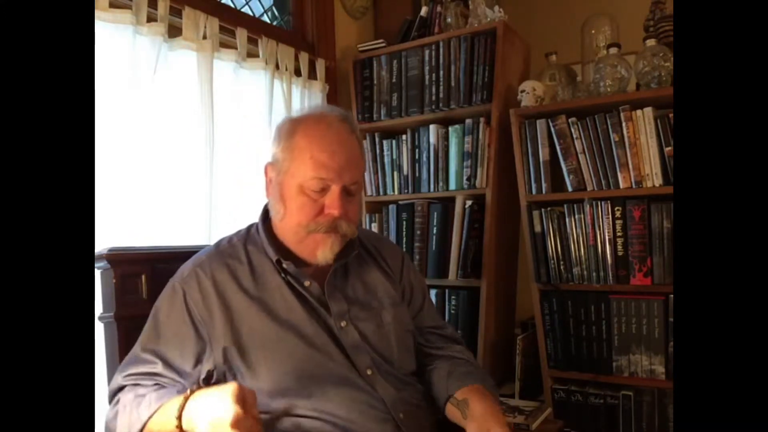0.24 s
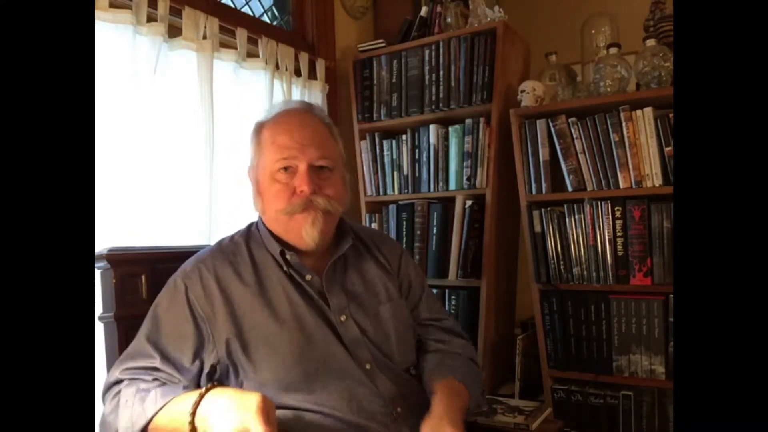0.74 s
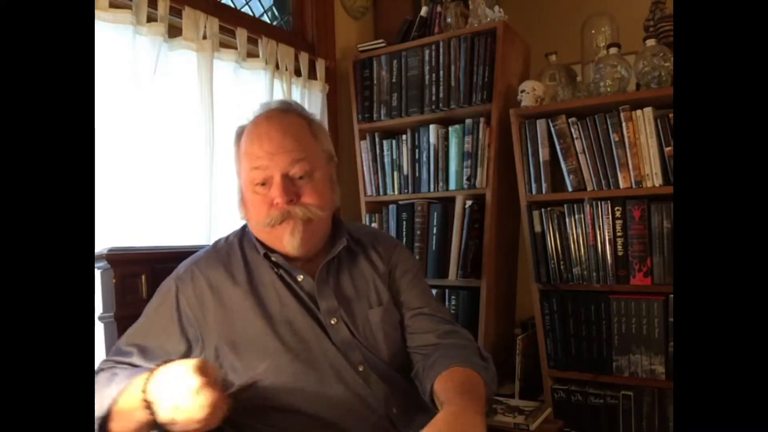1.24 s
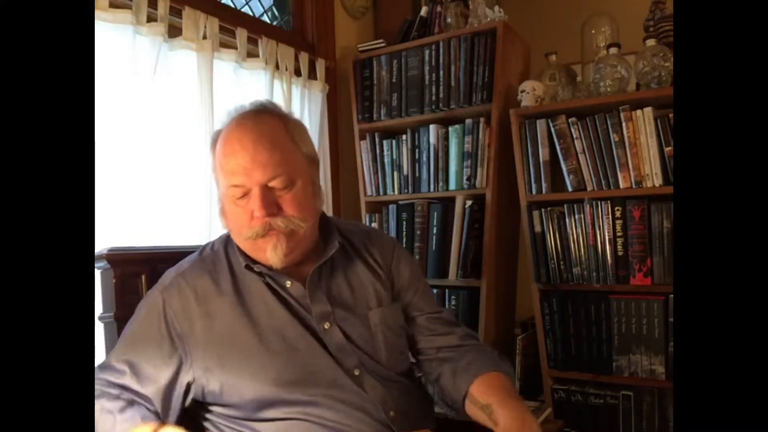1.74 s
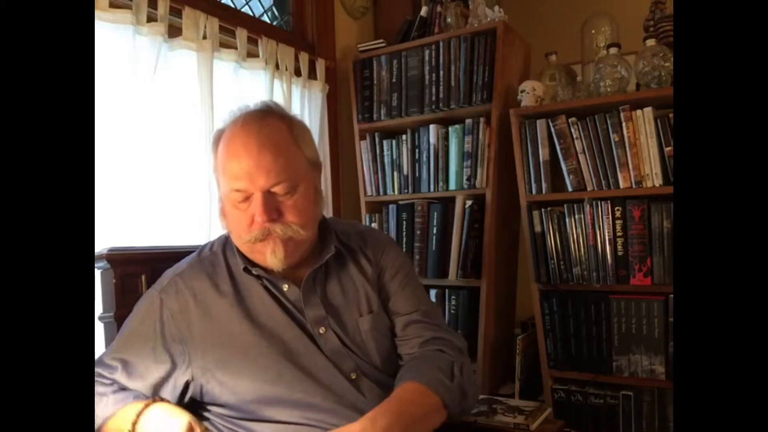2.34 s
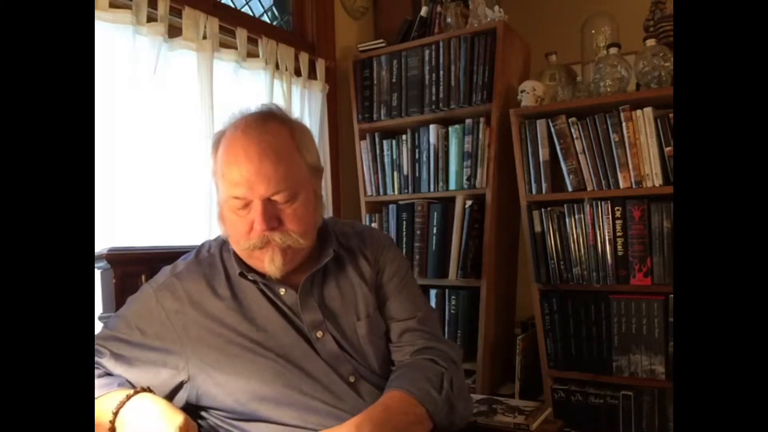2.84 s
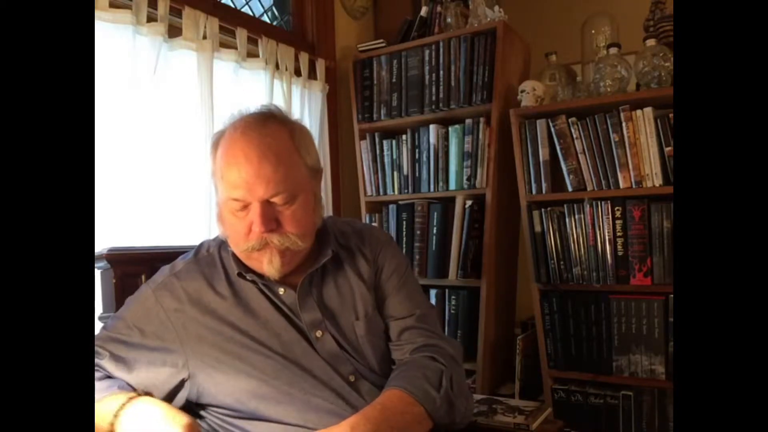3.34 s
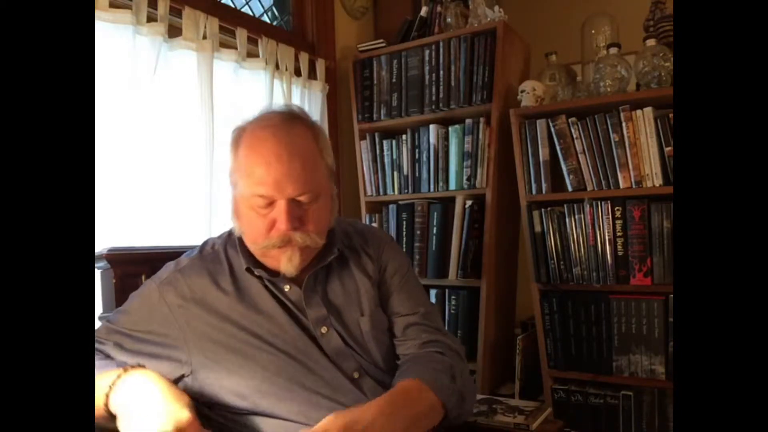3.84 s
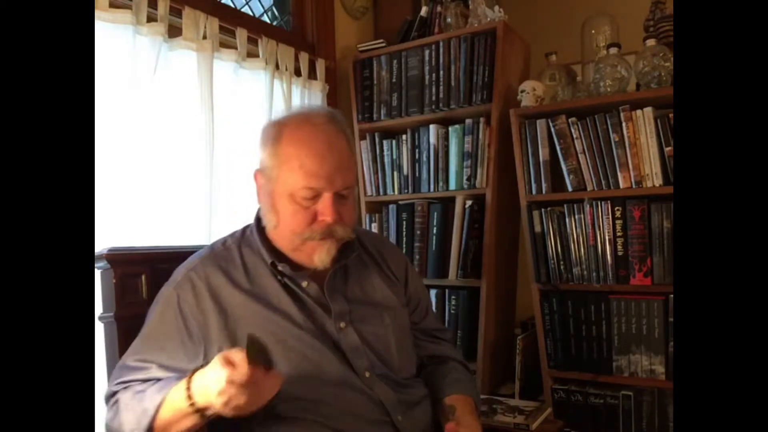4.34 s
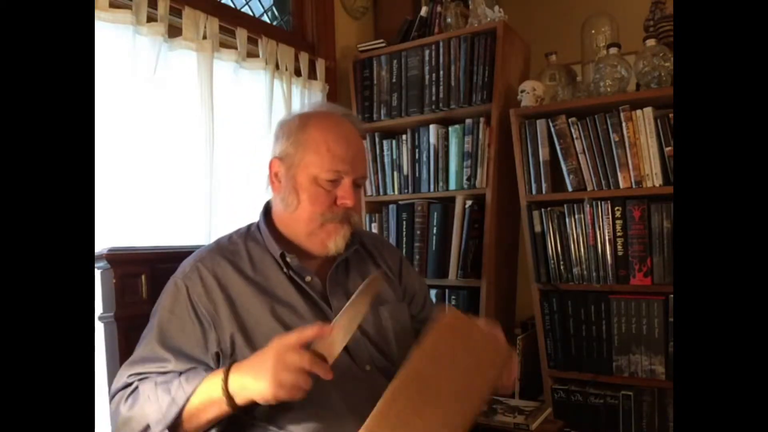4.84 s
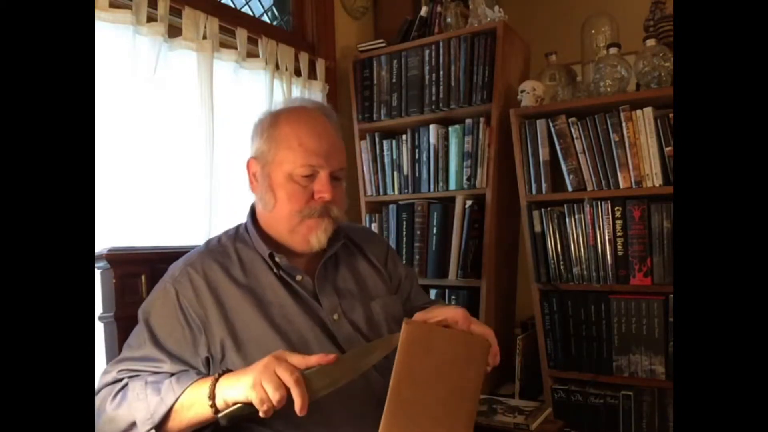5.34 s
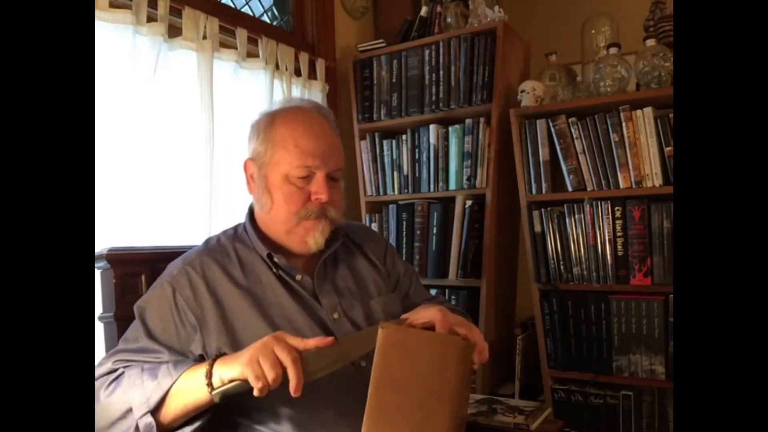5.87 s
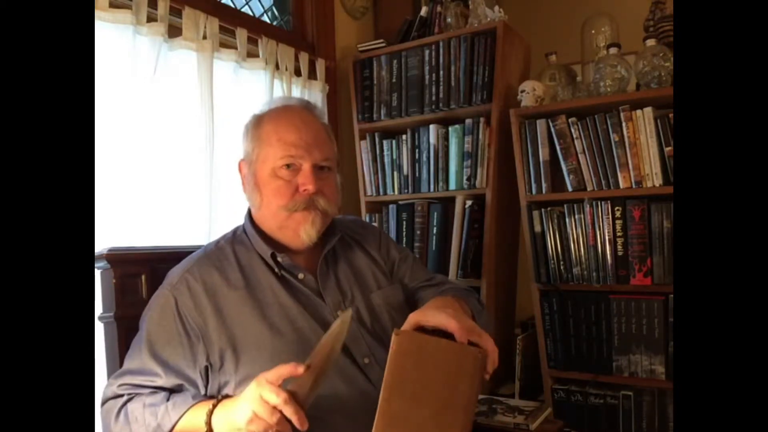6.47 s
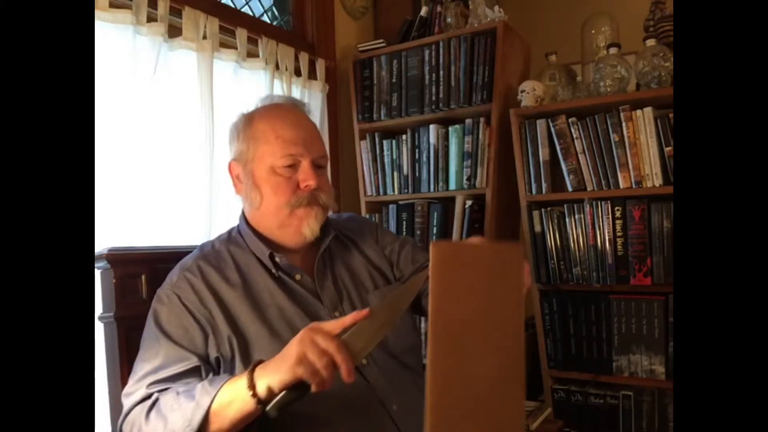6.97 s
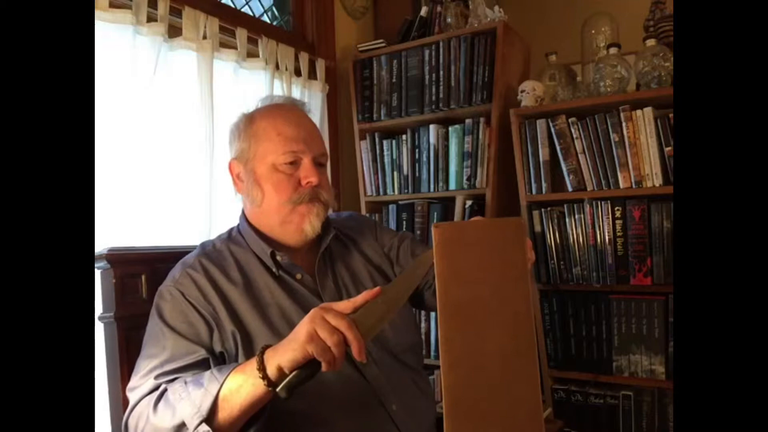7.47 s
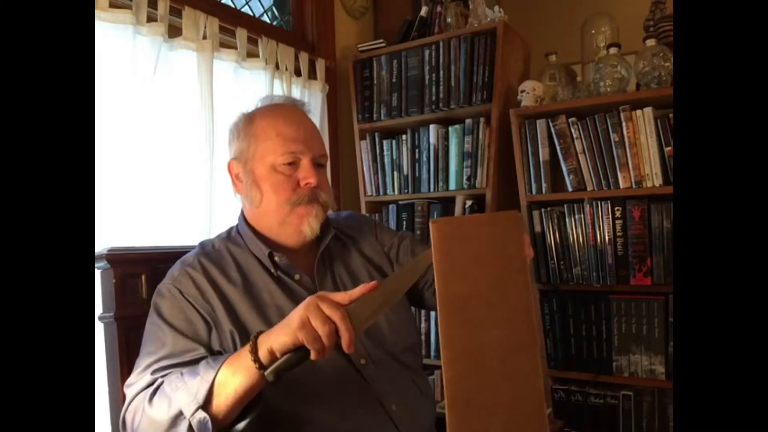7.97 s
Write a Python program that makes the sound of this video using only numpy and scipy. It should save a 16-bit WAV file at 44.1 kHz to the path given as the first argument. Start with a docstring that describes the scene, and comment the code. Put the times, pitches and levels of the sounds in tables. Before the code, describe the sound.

In a quiet small room, a box is shuffled, a knife clacks down, tape bursts and tears, and the cardboard is lifted with light taps.

```python
"""A knife opens a cardboard box

In a small, quiet room hands and box slide, the blade clacks, then punches through tape and runs along the seam.
The box is lifted and handled, with hollow knocks and small clicks. Friction is random slip impulses through
spectra and resonances; blows are decaying noise and modes with a short room tail. Both channels are alike."""
import sys
import numpy as np
from scipy import signal
from scipy.fft import rfft, irfft, next_fast_len
from scipy.io import wavfile
from scipy.ndimage import uniform_filter1d, map_coordinates

SR = 44100
rng = np.random.default_rng(int(sys.argv[2]) if len(sys.argv) > 2 else 0)


def int16_out(signal):
    """Quantize to a 16-bit WAV file."""
    q = np.round(np.clip(np.atleast_2d(signal).T, -1, 1) * 32767)
    wavfile.write(sys.argv[1], SR, q.astype(np.int16))


N = 361837
T = np.arange(SR // 3) / SR  # time axis of one blow [s]

# Blade strokes in the seam:
# (fastest motion [s], rise [s], fall [s], tape hiss [dB], bright rasp [dB], hollow rasp [dB])
SEAM_PULLS = [(3.627, 0.043, 0.027, -43.5, -40, -53), (3.68, .075, 0.13, -53.5, -46.5, -44.5),
              (3.93, 0.069, 0.051, -53.5, -55, -53)]
# Hiss of torn tape: (frequency [Hz], relative level [dB])
TAPE_SPECTRUM = [(2000, -45), (4000, 3), (4900, -2), (5800, 4.5), (7500, -1.5), (10000, -3), (13000, -7),
                 (16000, -15)]
# Resonances of the seam: (frequency [Hz], width [Hz], relative level [dB])
SEAM_MODES = [(2135, 120, -3.5), (2390, 210, -7), (2710, 55, 1.5), (3240, 140, -0.5), (3870, 300, -18)]
# Resonances of the open slit: (frequency [Hz], width [Hz], relative level [dB])
SLIT_MODES = [(1400, 300, 5.5), (1705, 95, 10), (1770, 170, -13)]
# Resonances of the card panels: (frequency [Hz], width [Hz], relative level [dB])
PANEL_MODES = [(118, 57, -5), (200, 51, 0.5), (308, 115, -0.5), (430, 28, -6.5), (593, 83, -5.5)]
# Resonances of the stiff box edges: (frequency [Hz], width [Hz], relative level [dB])
EDGE_MODES = [(454, 203, 0.5), (627, 108, 3.5), (950, 235, -3), (1185, 200, -2.5), (1446, 260, -3.5)]
# the blade shakes the box for as long as it is in the seam
CUT_S, CUT_HOLD_S, CUT_DRONE_DB = 3.56, 0.396, -51


def cutting():
    """Stick-slip tearing: one train of uneven slips excites the tape, the seam, the opening slit and the box."""
    hiss, bright, hollow = movements(SEAM_PULLS)
    drone = amp(CUT_DRONE_DB) * swell(CUT_S, rise_s=0.066, fall_s=0.021, hold_s=CUT_HOLD_S)
    tear = slips(rate=3500, spread_db=1.5, clump_db=1.1, clump_rate=170)
    tape = reflected(coloured(tear, TAPE_SPECTRUM), wet_db=-5.5)
    seam = shifting(band(resonate(tear, SEAM_MODES), 1750, 4800), patchy_db=2.5)
    slit = shifting(band(resonate(tear, SLIT_MODES), 680, 2460), patchy_db=5.5)
    body = resonate(tear, PANEL_MODES) + amp(-14) * resonate(tear, EDGE_MODES)
    box = unit(band(body, 135, 1400))
    return hiss * tape + bright * seam + hollow * slit + drone * box


# The point breaking through the tape:
# (time [s], overall gain [dB], treble tilt setting [dB], boom gain [dB], tearing t60 [s])
TAPE_STABS = [(3.4057, -19, -9, -5, 0.3), (3.4731, -19.5, -17, -7, 0.27), (3.5075, -23, -23.5, -7.5, 0.044)]
# Crack of the tape: (frequency [Hz], relative level [dB])
CRACK_SPECTRUM = [(150, -34), (600, -2.5), (1400, -1), (2200, -2), (3200, -2.5), (4800, -4.5), (6500, -6.5),
                  (9500, -5.5), (12500, -8.5), (16000, -7.5)]
# The lid springing under each stab: (frequency [Hz], level within the boom [dB], t60 [s])
LID_MODES = [(118, -11, .11), (245, -5, .07)]
# The box standing on the table: (frequency [Hz], width [Hz], relative level [dB])
BOOM_MODES = [(128, 24, -0.5), (187, 26, -0.5), (242, 98, -3.5), (335, 44, -1.5), (431, 15, -5.5),
              (620, 16, -5.5), (1070, 130, -50), (1435, 110, -10.5)]


def stabs():
    """Sudden release of tension: taut tape bursts, fibres tear on, and the impulse sets lid and box ringing."""
    out = np.zeros(N)
    for s, db, bright_db, boom_db, t60 in TAPE_STABS:
        # the tilt grows with frequency up to 9 kHz
        tilt_db = bright_db + 9.5
        burst = filtered(coloured(noise(), CRACK_SPECTRUM), lambda hz: amp(tilt_db * np.clip(hz / 9000, 0, 1)))
        crack = burst * (fade(0.03) + amp(-11.5) * fade(t60))
        push = sum(amp(level) * np.sin(2 * np.pi * hz * T) * fade(life) for hz, level, life in LID_MODES)
        thump = fade(0.0012) + amp(-12) * noise() * fade(0.058)
        boom = peak(resonate(thump, BOOM_MODES))
        stab = amp(-6.5) * crack + amp(boom_db) * (push + amp(-3) * boom)
        add(out, s, amp(db) * in_room(stab, wet_db=-13.5))
    return out


# The blade landing and chattering: (time [s], overall gain [dB])
BLADE_LANDINGS = [(1.6616, -21), (1.6677, -23.5)]
# Modes of the ringing blade: (frequency [Hz], relative level [dB], t60 [s])
BLADE_MODES = [(1142, -3, 0.057), (1557, 4.5, 0.051), (2025, 0.5, 0.061), (2200, -15, 0.076),
               (2747, 7, 0.079), (3040, -15, 0.071), (2980, -2, 0.13), (3080, -7, 0.18), (3500, -14, 0.21),
               (3380, -3, 0.18), (4180, -8, 0.16), (4450, 2, 0.069), (5440, -3, 0.089), (5840, -5, 0.16),
               (6120, -7, 0.15), (6600, -16, 0.14), (7316, -9, 0.15), (9830, 0, 0.032), (13300, -8, .06)]
# Hard contact of the blade: (frequency [Hz], relative level [dB])
SMACK_SPECTRUM = [(100, -19), (350, -3.5), (750, -19), (1200, -1), (2400, -5), (3100, 6.5), (5000, -8.5),
                  (6100, 0.5), (8500, -13.5), (13000, -17), (16000, -23)]


def clacks():
    """Damped modal ringing: the hand-held blade lands flat, a hard contact and brief steel modes with chatter."""
    out = np.zeros(N)
    for s, db in BLADE_LANDINGS:
        ring = np.zeros(len(T))
        for hz, level, t60 in BLADE_MODES:
            # chatter scatters the phase, most for the high modes
            drift = np.cumsum(noise()) * .075 * hz / SR
            tone = np.sin(2 * np.pi * (hz * T + drift + rng.random()))
            ring += amp(level + rng.normal(0, 1.2)) * fade(t60) * tone
        smack = coloured(noise(), SMACK_SPECTRUM) * fade(0.11)
        onset = 1 - np.exp(-T / 0.00087)
        clack = (amp(-2.5) * peak(ring) + amp(-10.0) * smack) * onset
        add(out, s, amp(db) * in_room(clack, wet_db=-15.5))
    return out


# Soft blows on the box: (time [s], overall gain [dB], panel pitch [Hz], edge rap setting [dB])
BOX_KNOCKS = [(.546, -51.5, 112, -20), (.851, -31.5, 118, -20), (0.855, -29.5, 264, -21),
              (1.036, -43, 263, -4), (1.074, -43.5, 285, -3.5), (1.273, -38.5, 295, -9.5),
              (1.283, -36.5, 350, -28), (1.354, -51.5, 360, -3), (2.851, -39, 229, -25),
              (3.127, -56, 171, -18), (3.863, -45, 284, -3), (3.96, -44.5, 260, -7.5),
              (4.849, -42.5, 141, -25), (4.859, -41.5, 267, -6.5), (4.871, -41, 265, -12.5),
              (4.96, -52, 710, -3), (5.159, -45.5, 252, -15), (5.216, -51, 250, -15),
              (5.328, -45, 267, -17), (5.361, -35.5, 266, -13), (5.407, -51.5, 320, -5),
              (5.44, -51, 228, -24), (5.517, -36, 263, -10), (5.533, -49, 317, -13), (5.792, -50, 230, -36),
              (5.844, -50.5, 198, -14), (5.881, -49.5, 240, -15), (6.018, -53.5, 211, -10),
              (6.084, -49.5, 185, -17), (6.099, -50, 198, -14), (6.205, -54, 204, -13),
              (6.371, -48, 175, -19), (6.391, -47.5, 193, -15), (6.437, -36, 310, -13),
              (6.63, -49, 219, -30), (6.735, -51.5, 234, -4), (6.793, -58.5, 196, 1),
              (7.121, -52.5, 400, -2), (7.294, -63, 178, -3)]
SWING_CYCLES, PUSH_CYCLES = 6.5, 1  # cycles to decay by 60 dB; time constant of the build-up in cycles


def knocks():
    """Impact on a damped plate: a push swings one panel and raps the edges; firm ones also jolt the whole box."""
    out = np.zeros(N)
    for s, db, hz, rap_db in BOX_KNOCKS:
        build_up = (1 - np.exp(-T * hz / PUSH_CYCLES)) ** 2
        swing = peak(np.sin(2 * np.pi * hz * T) * fade(SWING_CYCLES / hz) * build_up)
        panels = peak(band(resonate(noise() * fade(0.079), PANEL_MODES), 70, 506))
        rap = peak(band(resonate(contact(t60=0.089, grit_db=-21.5), EDGE_MODES), 386, 1460))
        firmness = amp(min(.5 * (db + 31.5), 0))
        jolt = peak(band(noise() * fade(0.11), 68.5, 167)) * firmness
        # a padded touch hardly reaches the edges
        hardness = amp(rap_db + 5.5 + min(rap_db + 17.0, 0))
        blow = swing + amp(-10) * panels + hardness * rap + amp(-13.0) * jolt
        add(out, s, amp(db) * in_room(blow, wet_db=-11))
    return out


# The broad face of the box sliding: (frequency [Hz], relative level [dB])
SWISH_SPECTRUM = [(900, -21), (1900, -4.5), (2600, 1.5), (3300, -1.5), (3900, -6), (4700, -1.5), (6500, -1),
                  (8500, -5.5), (10500, -9), (13000, -10), (16000, -19)]
LIFT_S, LIFT_HOLD_S, LIFT_DB = 4.67, 0.18, -51.5  # the box slides up off the table at an even speed
LIFT_SCUFF_DB, LIFT_DRONE_DB = -70, -72  # what its edges and panels add meanwhile
JUDDER_S, JUDDER_SCUFF_DB, JUDDER_DRONE_DB = 4.872, -55, -41.5  # its end judders over the table's edge
SETTLE_DB = -67.5  # then it settles in the hand


def lifting():
    """Sliding friction: dense slips of a broad card face swish, then shake edges and panels at the table's edge."""
    slide = swell(LIFT_S, rise_s=0.042, fall_s=0.015, hold_s=LIFT_HOLD_S)
    judder = swell(JUDDER_S, rise_s=0.018, fall_s=0.039)
    settle = swell(JUDDER_S, rise_s=0.012, fall_s=0.18)
    drag = slips(rate=14000, spread_db=0.5, clump_db=1.5, clump_rate=140)
    swish = shifting(reflected(coloured(drag, SWISH_SPECTRUM), wet_db=-9.5), patchy_db=1.0)
    edges = unit(band(resonate(drag, EDGE_MODES), 530, 1800))
    panels = unit(band(resonate(drag, PANEL_MODES), 150, 446))
    sliding = amp(LIFT_DB) * swish + amp(LIFT_SCUFF_DB) * edges + amp(LIFT_DRONE_DB) * panels
    shaking = amp(JUDDER_SCUFF_DB) * edges + amp(JUDDER_DRONE_DB) * panels
    settling = amp(SETTLE_DB) * (swish + edges + panels)
    return slide * sliding + judder * shaking + settle * settling


# Strokes of hand, sleeve and box:
# (fastest motion [s], rise [s], fall [s], hiss [dB], scuff [dB], panel drone [dB])
HAND_STROKES = [(.19, 0.084, 0.072, -59, -58.5, -60.5), (.33, 0.031, 0.02, -50, -48, -71),
                (.622, 0.015, 0.029, -52.5, -64, -67), (.72, 0.036, 0.054, -56.5, -51, -49),
                (.86, 0.14, 0.11, -51, -50, -59), (.927, 0.0068, 0.021, -54, -46.5, -55),
                (.972, .01, 0.024, -47.5, -51, -50.5), (.994, 0.017, 0.0066, -47, -46, -58),
                (1.085, 0.022, .018, -79, -62, -47.5), (1.117, 0.012, .06, -47.5, -57, -58),
                (1.185, .05, 0.046, -52.5, -55.5, -64), (1.34, 0.18, 0.18, -66, -61.5, -59),
                (1.478, .055, 0.056, -52.5, -59.5, -59), (1.62, 0.026, 0.026, -56.5, -59, -83),
                (1.9, 0.16, 0.1, -72, -74, -73), (2.45, 0.047, 0.073, -74, -84, -72),
                (2.84, 0.19, 0.17, -66.5, -68.5, -69), (3.24, 0.06, 0.45, -74.5, -78, -71),
                (4.24, 0.067, 0.16, -75, -73, -73.5), (4.45, 0.026, 0.037, -64.5, -69.5, -63.5),
                (4.572, 0.0093, 0.066, -65.5, -62, -61.5), (5.88, 0.13, 0.34, -79, -71.5, -68.5),
                (6.1, 0.023, .17, -81, -69, -65), (6.41, 0.058, 0.092, -68, -69, -62),
                (6.56, 0.017, 0.076, -69.5, -65.5, -65.5), (6.71, 0.054, 0.035, -69.5, -64, -53.5),
                (6.79, 0.14, 0.092, -73.5, -68, -76)]
# Fine rubbing: (frequency [Hz], relative level [dB])
HISS_SPECTRUM = [(1200, -13), (2600, 0), (4000, -2.5), (6500, 2), (9000, -2.5), (10500, -6), (13000, -4.5),
                 (16000, -15)]
# Coarse rubbing of card: (frequency [Hz], relative level [dB])
SCUFF_SPECTRUM = [(250, -15.5), (600, -1), (850, -3), (1100, 2.5), (1550, 1.5), (2200, -4.5), (3200, -3.5),
                  (4500, -10.5), (8000, -69)]


def rubbing():
    """Friction noise of skin and cloth on card: fine slips hiss, coarser ones scuff and shake the panels."""
    hiss, scuff, drone = movements(HAND_STROKES)
    fine_slips = slips(rate=10000, spread_db=0.5, clump_db=1.5, clump_rate=110)
    fine = reflected(coloured(fine_slips, HISS_SPECTRUM), wet_db=-10.0)
    coarse_slips = slips(rate=2500, spread_db=2.5, clump_db=2.5, clump_rate=130)
    coarse = reflected(coloured(coarse_slips, SCUFF_SPECTRUM), wet_db=-2.0)
    panel_slips = slips(rate=2500, spread_db=4, clump_db=1.0, clump_rate=57)
    panels = unit(band(resonate(panel_slips, PANEL_MODES), 138, 597))
    return hiss * shifting(fine, patchy_db=.7) + scuff * shifting(coarse, patchy_db=2.0) + drone * panels


# Small snaps of tape and card:
# (time [s], direct peak [dB], centre [Hz], reach either side [octaves], crumpling t60 [s])
CARD_CLICKS = [(.467, -53, 8500, 0.58, .005), (.848, -33, 2600, 1.3, .008), (.9675, -32, 6000, 1, .03),
               (1.272, -43.5, 2300, 1.07, .03), (1.889, -49, 2800, 0.34, 0.036),
               (3.509, -34, 1200, 0.36, .015), (3.736, -34, 2020, 0.31, .02), (3.864, -42, 1500, 1.6, .04),
               (4.119, -44.5, 3500, .65, 0.058), (4.875, -43.5, 6000, 0.95, .07),
               (4.961, -53, 1680, 0.38, .04), (5.362, -43, 600, .5, .04), (5.519, -40.5, 570, .3, .06),
               (5.753, -51, 3000, 1.2, .015), (6.4385, -30, 3700, .65, .007),
               (6.795, -57, 2500, 1.2, 0.027), (7.123, -55.5, 2200, 1.4, 0.023),
               (7.814, -39, 9500, .9, 0.013)]


def clicks():
    """Band-limited impulses: tiny snaps, each a sharp crack and a short shiver of the card."""
    out = np.zeros(N)
    for s, db, centre_hz, octaves, t60 in CARD_CLICKS:
        edges = centre_hz * np.exp2(np.array([-1, 1]) * abs(octaves))
        edges = np.clip(edges, 100, SR / 2 - 500)
        passband = signal.butter(2, edges, "band", fs=SR, output="sos")
        snap = signal.sosfilt(passband, contact(t60, grit_db=-3.5))
        add(out, s, amp(db) * in_room(peak(snap), wet_db=-9))
    return out


# Card catching and chirping under hand or blade: (time [s], length [s], centre [Hz], level [dB])
CARD_SQUEAKS = [(0.596, 0.021, 3750, -61), (1.042, .018, 630, -56.5), (1.074, 0.015, 720, -56),
                (1.105, 0.061, 533, -50), (1.107, 0.088, 1250, -60), (1.111, 0.034, 1415, -48.5),
                (3.123, 0.012, 1460, -59), (3.86, 0.018, 880, -50), (6.079, 0.12, 596, -67),
                (6.604, 0.025, 1600, -63.5), (6.69, .04, 4050, -78), (6.8, 0.1, 4040, -77)]


def squeaks():
    """Stick-slip near one pitch, rendered as narrow-band noise under a short arch."""
    out = np.zeros(N)
    for s, length, centre_hz, db in CARD_SQUEAKS:
        width_hz = 20 + .03 * centre_hz
        whine = unit(filtered(noise(), lambda hz: 1 / (1 + ((hz - centre_hz) / width_hz) ** 2)))
        arch = np.sqrt(np.abs(np.sin(np.pi * np.clip(T / length, 0, 1))))
        add(out, s, amp(db) * whine * arch)
    return out


# Faint hush of the room: (frequency [Hz], relative level [dB])
HUSH_SPECTRUM = [(15, -22), (25, -5.5), (129, -5.5), (160, -7), (193, -4.5), (215, -6.5), (368, -10.5),
                 (457, -15), (552, -13.5), (1140, -15), (1410, -15.5), (2300, -18), (2850, -18.5),
                 (6380, -22.5), (15500, -31.5)]


def room_hush():
    """Stationary background noise: white noise shaped by a smooth spectrum."""
    return amp(-69.0) * coloured(rng.standard_normal(N), HUSH_SPECTRUM)


# Decay of the small room: (frequency [Hz], t60 [s])
ROOM_DECAY = [(100, 0.24), (400, 0.12), (1200, 0.17), (4000, 0.17), (14000, 0.052)]


def in_room(x, wet_db):
    """Reverberation by convolution: a blow plus the short answer of desk, shelves and walls."""
    hz, t, z = signal.stft(noise(), SR, nperseg=256)
    decay = amp(-60 * t / along(ROOM_DECAY, hz)[:, None])
    tail = signal.istft(z * decay, SR, nperseg=256)[1][:len(T)]
    # the tail sets in after 3 ms
    tail = tail * np.clip((T - .003) / 0.0021, 0, 1)
    return x + amp(wet_db) * signal.fftconvolve(x, tail / np.linalg.norm(tail))[:len(T)]


def reflected(x, wet_db, count=10):
    """Comb filtering: table top, lid and chest send back delayed copies of either sign."""
    out = x.copy()
    delays = rng.uniform(.0008, .012, count)
    signs = rng.choice([-1, 1], count)
    for delay, sign in zip(delays, signs):
        add(out, delay, sign * amp(wet_db) / np.sqrt(count) * x)
    return unit(out)


def slips(rate, spread_db, clump_db, clump_rate):
    """Microslip: fibres catch and let go as random impulses of uneven size, in clumps of stronger and weaker."""
    clumps = map_coordinates(rng.standard_normal(N // 50), [np.arange(N) * clump_rate / SR], order=1)
    caught = rng.random(N) < rate / SR
    sizes = amp(spread_db * rng.standard_normal(N) + clump_db * clumps)
    return caught * rng.choice([-1, 1], N) * sizes


def shifting(x, patchy_db):
    """Time-varying spectrum: as the contact travels, bands of the rasp flare and fade."""
    z = signal.stft(x, nperseg=512)[2]
    across_bands = uniform_filter1d(rng.standard_normal(z.shape), size=5, axis=0)
    field = uniform_filter1d(across_bands, size=6, axis=1)
    return unit(signal.istft(z * amp(patchy_db * unit(field)), nperseg=512)[1][:N])


def contact(t60, grit_db):
    """Impulsive excitation: one sharp push followed by a little crushing of fibres."""
    return signal.unit_impulse(len(T)) + amp(grit_db) * noise() * fade(t60)


SWELL_DB, ROUNDNESS = 8, 1.55  # drop over one rise or fall time [dB]; 1 = pointed top, 2 = bell


def swell(s, rise_s, fall_s, hold_s=0):
    """Friction level follows speed: a movement gathers speed up to time s, holds, and comes to rest."""
    t = np.arange(N) / SR - s
    away = np.maximum(-t / rise_s, (t - hold_s) / fall_s)
    near = away < 6
    gain = np.zeros(N)
    gain[near] = amp(-SWELL_DB * np.maximum(away[near], 0) ** ROUNDNESS)
    return gain


def movements(rows):
    """Energy summation: one gain curve for each dB column, overlapping movements adding in power."""
    shapes = np.array([swell(*row[:3]) for row in rows])
    gains = amp([row[3:] for row in rows])
    return np.sqrt(gains.T ** 2 @ shapes ** 2)


def resonate(x, modes):
    """Modal superposition: x through causal resonances of alternating sign, at rms 1."""
    def response(f):
        total = 0
        for k, (centre, width, db) in enumerate(modes):
            damping = 1j * f * width
            total = total + (-1) ** k * amp(db) * damping / (centre * centre - f * f + damping)
        return total
    return unit(filtered(x, response))


def coloured(x, spectrum):
    """Spectral shaping: x through a smooth spectrum, at rms 1."""
    return unit(filtered(x, lambda hz: amp(along(spectrum, hz))))


def filtered(x, response):
    """Linear filtering: multiply the spectrum of x by a response of frequency."""
    m = next_fast_len(len(x) + SR // 4)
    return irfft(rfft(x, m) * response(np.fft.rfftfreq(m, 1 / SR)), m)[:len(x)]


def band(x, low_hz, high_hz):
    """Band limitation by a steep causal band-pass."""
    return signal.sosfilt(signal.butter(3, [low_hz, high_hz], "band", fs=SR, output="sos"), x)


def along(points, hz):
    """Logarithmic pitch scale: interpolate (frequency [Hz], value) points on a log axis."""
    f, v = np.transpose(points)
    return np.interp(np.log(hz + 1), np.log(f), v)


def fade(t60):
    """Exponential decay: 60 dB lost in t60 seconds."""
    return amp(-60 * T / t60)


def noise():
    """Broadband excitation: fresh white noise for one blow."""
    return rng.standard_normal(len(T))


def add(track, s, x):
    """Superposition: mix x into the track at time s."""
    part = track[round(s * SR):][:len(x)]
    part += x[:len(part)]


def amp(db):
    """Level law: decibels to amplitude gain."""
    return 10 ** (np.asarray(db) / 20)


def unit(x):
    """Energy normalisation to rms 1."""
    return x / np.sqrt(np.mean(x ** 2) + 1e-20)


def peak(x):
    """Amplitude normalisation to peak 1."""
    return x / np.abs(x).max()


def scene():
    """Superposition of sources at one microphone, sent alike to both channels."""
    blade = cutting() + stabs() + clacks()
    box = knocks() + lifting() + rubbing() + clicks() + squeaks()
    mono = blade + box + room_hush()
    return np.array([mono, mono])


LOW_HZ, TOP_HZ = 43, 15900  # the microphone's bass limit and the upper band limit


def record(dry):
    """Limited bandwidth: the microphone sheds deep bass, and a steep low-pass ends the treble."""
    bass_cut = signal.butter(2, LOW_HZ, "high", fs=SR, output="sos")
    thin = signal.sosfilt(bass_cut, dry)
    return np.array([filtered(x, lambda hz: np.clip((TOP_HZ - hz) / 200 + .5, 0, 1)) for x in thin])


dry = scene()
out = record(dry)
int16_out(out)
```